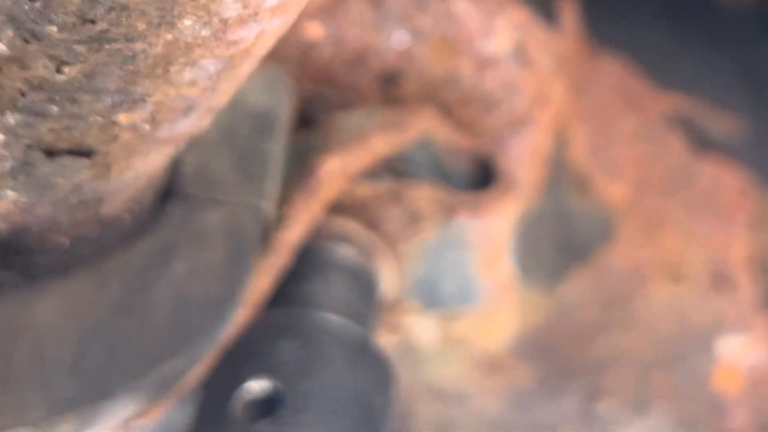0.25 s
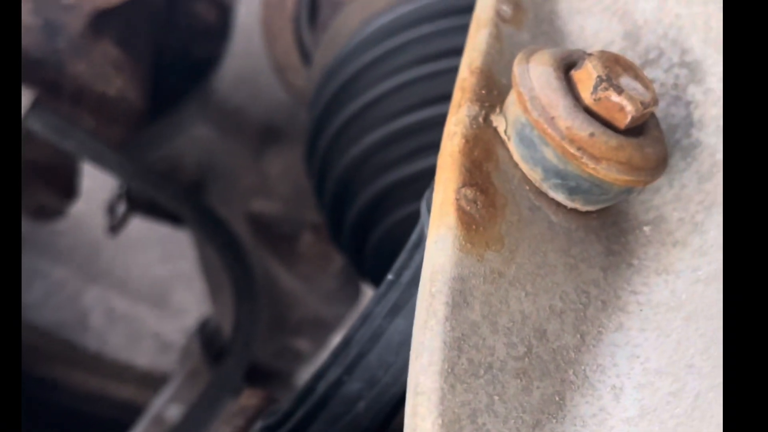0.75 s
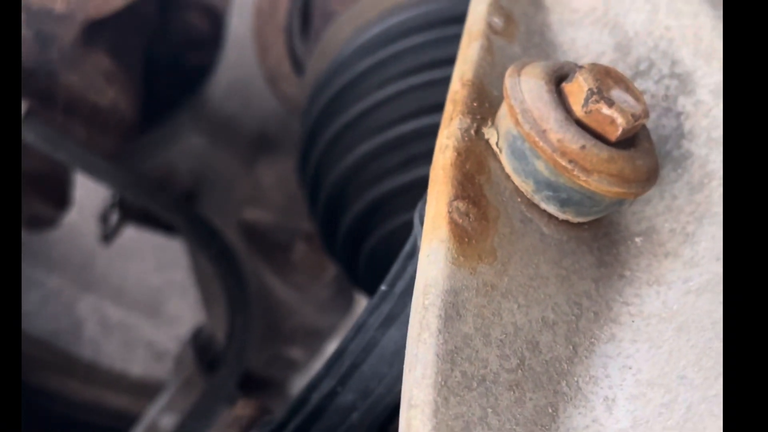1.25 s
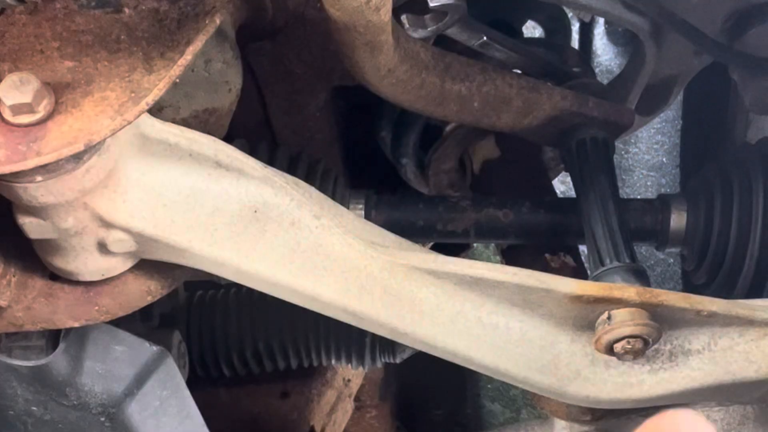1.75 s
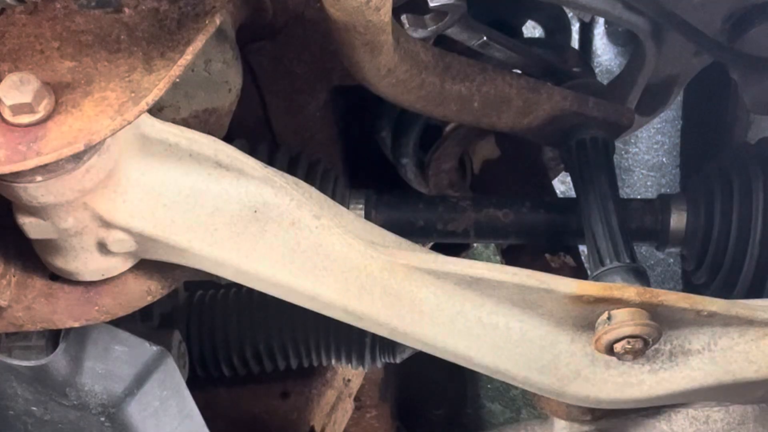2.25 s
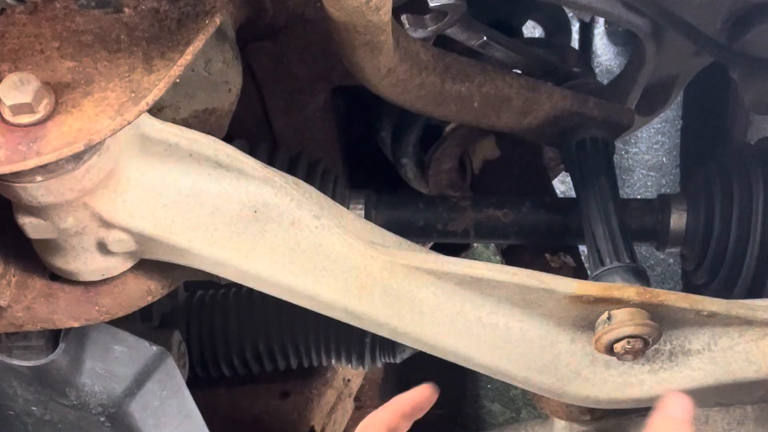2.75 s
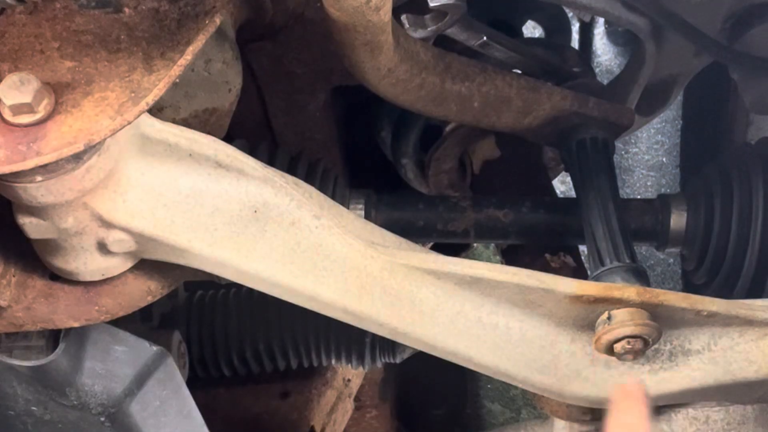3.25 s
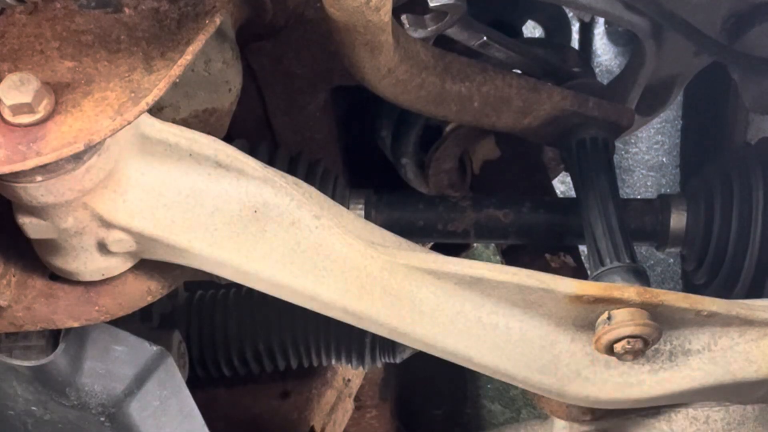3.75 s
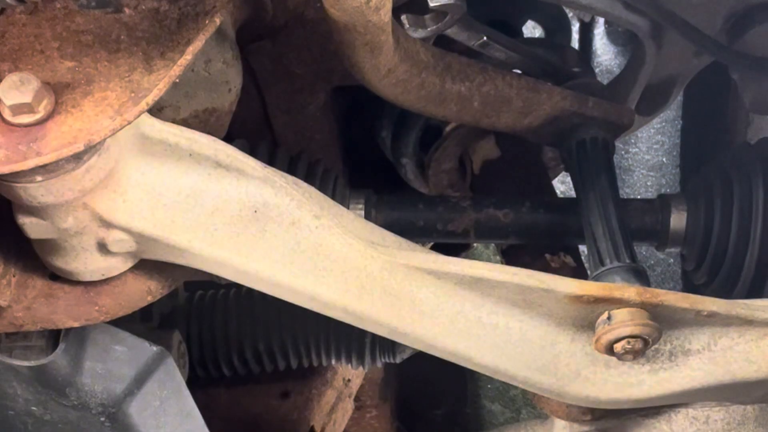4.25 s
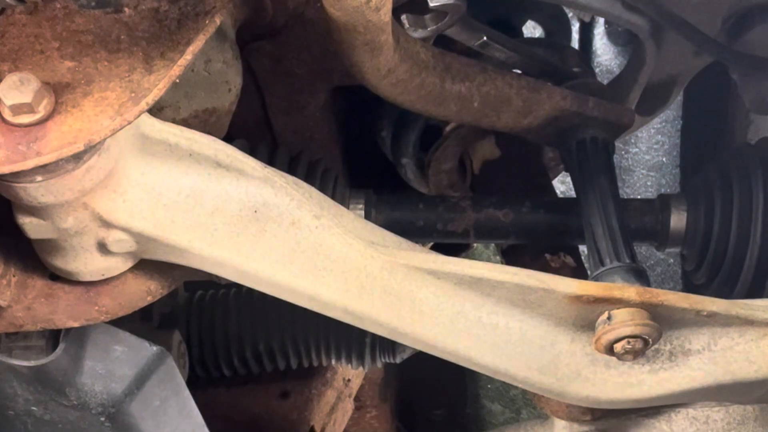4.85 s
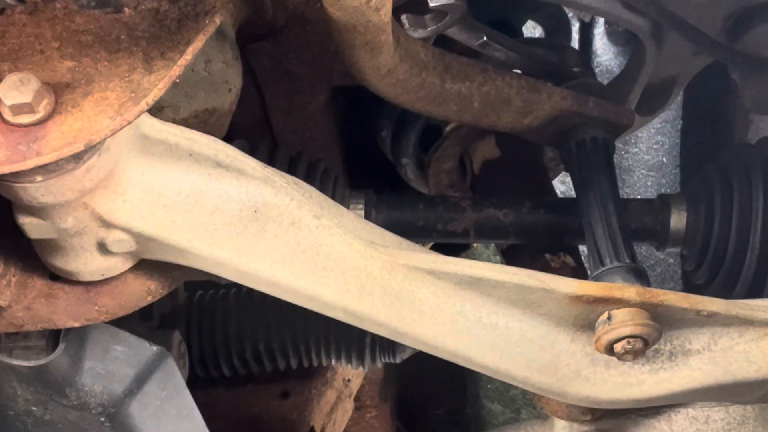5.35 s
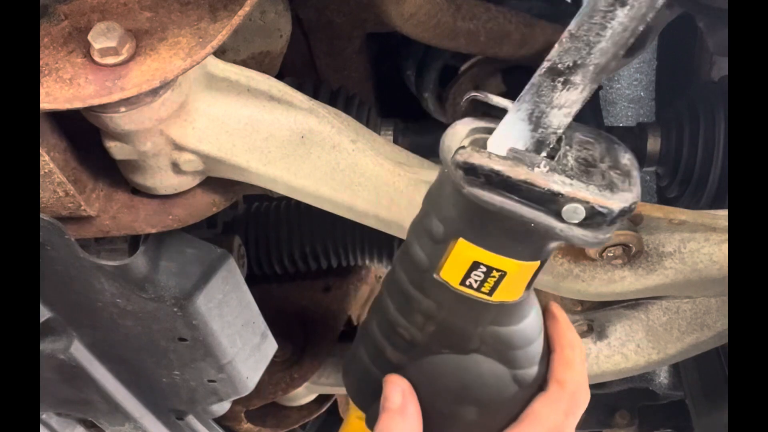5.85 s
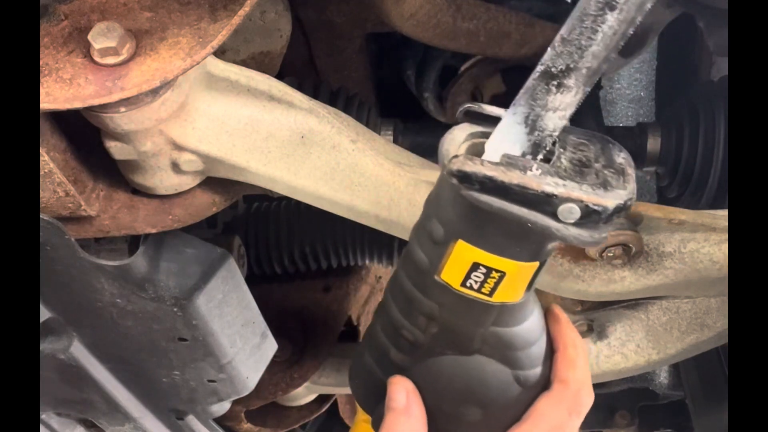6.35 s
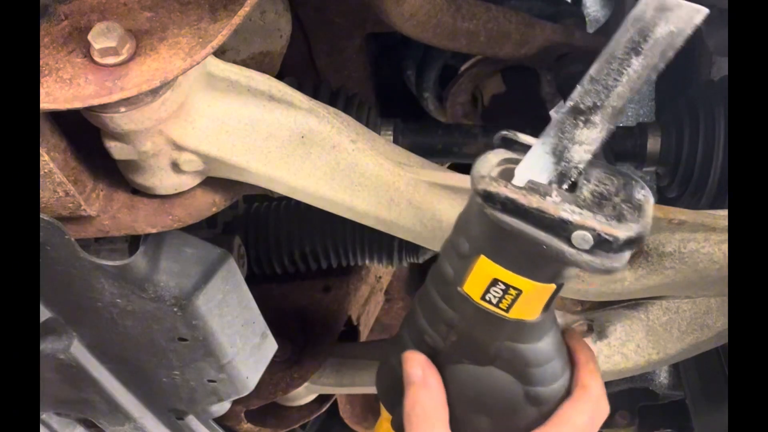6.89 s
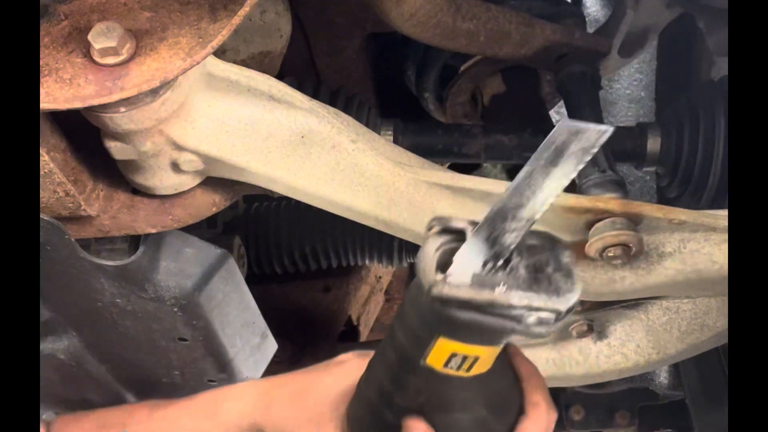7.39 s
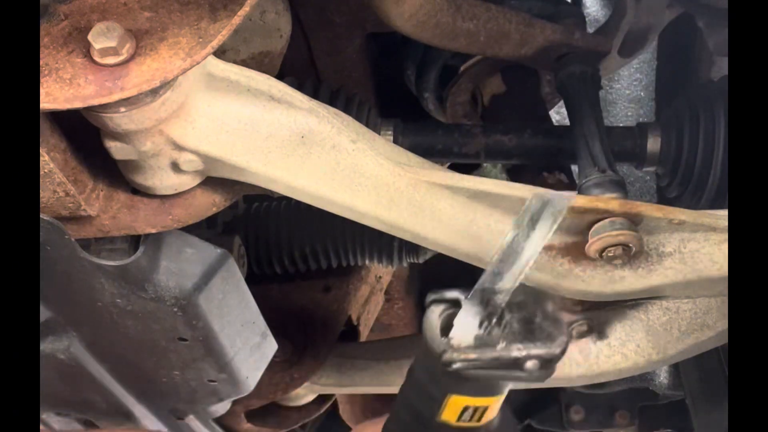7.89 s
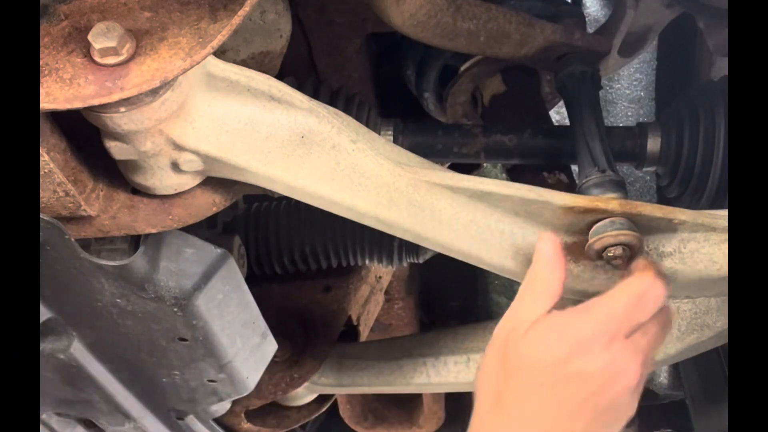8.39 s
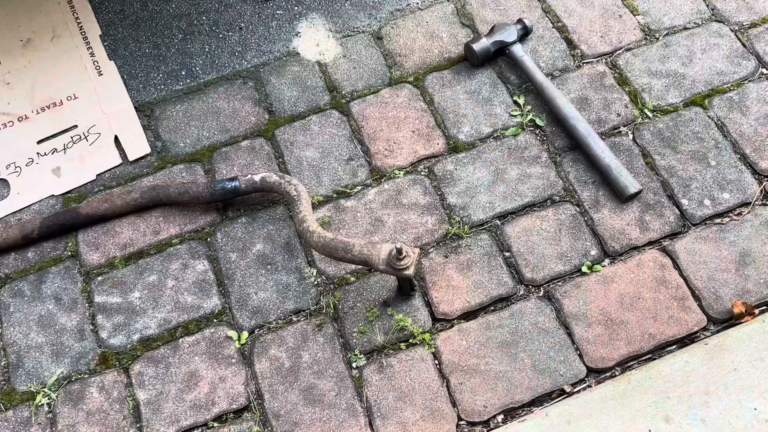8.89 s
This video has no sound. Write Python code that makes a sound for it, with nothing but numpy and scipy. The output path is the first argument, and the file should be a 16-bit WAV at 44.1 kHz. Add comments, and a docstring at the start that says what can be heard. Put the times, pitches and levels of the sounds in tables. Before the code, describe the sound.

A loose suspension rod knocks in metallic bursts over a truck's road rumble, then a cut to a few quiet footsteps.

```python
"""Inside a truck on a rough road. A loose stabiliser link (a suspension rod) knocks in bursts, ringing its
metal bar. Behind it the tyres boom, the body roars and thumps, air hisses and grit ticks. In some treble bands
left and right are in step, in others out of step, so the high sound is wide and hollow in the middle. The drive
plays twice (its last part, a short gap, then all of it), then cuts to a quiet yard with a few steps."""
import sys
import numpy as np
from scipy import signal
from scipy.fft import rfft, irfft, next_fast_len
from scipy.io import wavfile
from scipy.ndimage import uniform_filter1d, map_coordinates

SR = 44100
rng = np.random.default_rng(int(sys.argv[2]) if len(sys.argv) > 2 else 0)


def wav_out(sig):
    """Save sig, one row per channel (or a flat mono array), as 16-bit PCM at SR to the path in sys.argv[1]."""
    wavfile.write(sys.argv[1], SR, np.round(np.clip(np.atleast_2d(sig).T, -1, 1) * 32767).astype(np.int16))


N = 402633
TIME = np.arange(N) / SR
START_S, STOP_S = 3.58, 8.2005  # when the whole drive plays


def amp(db):
    """Turn decibels into a gain."""
    return 10 ** (np.asarray(db) / 20)


def unit(x):
    """Scale a sound to an average (rms) size of 1."""
    return x / np.sqrt(np.mean(x ** 2) + 1e-20)


def peak_one(pair):
    """Scale a two-row sound so that its first row peaks at 1."""
    return pair / np.abs(pair[0]).max()


def along(points, hz):
    """Read between (pitch, value) points on a log pitch scale."""
    pitches, values = np.transpose(points)
    return np.interp(np.log(hz + 1), np.log(pitches + 1), values)


def curves(rows):
    """Join (time, value, ...) rows into one curve per value column."""
    times, *columns = np.transpose(rows)
    return [np.interp(TIME, times, column) for column in columns]


def wobble(rate):
    """A smooth curve through `rate` random values a second."""
    return map_coordinates(rng.standard_normal(int(N * rate / SR) + 4), [TIME * rate])


def filtered(x, response):
    """Filter a sound; response(hz) gives the gain and phase at each pitch."""
    size = next_fast_len(x.shape[-1] + 2048)
    return irfft(rfft(x, size) * response(np.fft.rfftfreq(size, 1 / SR)), size)[..., :x.shape[-1]]


def resonances(peaks):
    """The response of something that rings at (pitch, width, level) peaks."""
    return lambda f: sum((-1) ** k * amp(db) * 1j * f * width / (hz * hz - f * f + 1j * f * width)
                         for k, (hz, width, db) in enumerate(peaks))


def rush(spectrum, patchy_db):
    """Two unrelated noises of the same tone colour, with random louder and softer patches."""
    cells = signal.stft(rng.standard_normal((2, N)), nperseg=512)[2]
    patches = uniform_filter1d(rng.standard_normal(cells.shape[1:]), size=5, axis=0)
    patches = unit(uniform_filter1d(patches, size=5, axis=1))
    pair = signal.istft(cells * amp(patchy_db * patches), nperseg=512)[1][:, :N]
    return unit(filtered(pair, lambda hz: amp(along(spectrum, hz))))


def add(track, start, sound):
    """Mix a two-row sound into the track at `start` seconds."""
    at = round(start * SR)
    track[:, at:at + sound.shape[1]] += sound[:, :N - at]


def tick(hz, fade, sharp):
    """A puff of noise around one pitch. Here and below, a fade is the time to fall 60 dB."""
    t = np.arange(SR // 12) / SR
    puff = rng.standard_normal((2, len(t))) * amp(-60 * t / fade) * (1 - np.exp(-t / .00054))
    b, a = signal.iirpeak(hz, sharp, SR)
    return peak_one(signal.lfilter(b, a, signal.lfilter(b, a, puff)))


def pulses(rows):
    """Very short tones that swell and die away. Returns their sound and its loudness outline."""
    out, t = np.zeros((2, N)), np.arange(-SR // 10, SR // 10) / SR
    for (start, db, hz, width), phase in zip(rows, rng.random(len(rows))):
        swell = amp(db) * np.exp(-.5 * (t / np.clip(width, .0008, .03)) ** 2)
        add(out, start + t[0], np.array([swell * np.sin(2 * np.pi * (hz * t + phase)), swell]))
    return out


# Tone colour of far traffic: (pitch [Hz], level [dB])
TRAFFIC_COLOUR = [(12, -40), (25, -25), (40, -12), (60, -2), (80, -3), (108, 0), (140, -8), (210, -16),
                  (260, -25), (400, -32), (900, -120)]

def traffic():
    """Far traffic hums, with one steadier tone inside the hum."""
    hum = amp(-54.5 + .91 * wobble(14)) * rush(TRAFFIC_COLOUR, patchy_db=-.2)
    hum[0] += amp(-57.5 + 1.3 * wobble(20)) * np.sin(2 * np.pi * 104 * TIME + 1.1 * wobble(8))
    return hum


# Shoe scuffs: (time [s], level [dB], fade [s], thump level [dB], thump pitch [Hz])
SCUFFS = [(8.219, -46.5, 0.12, -45, 520), (8.337, -71, .05, -56, 480), (8.356, -53, 0.15, -62, 500),
          (8.482, -44.5, 0.11, -50, 560), (8.735, -60, 0.11, -46.5, 420)]
# What rings under a step: (pitch [Hz], width [Hz], level [dB])
PAVING_RINGS = [(580, 63, 4), (1400, 29, -9), (1600, 28, -5), (2020, 40, -3), (2500, 35, -11),
                (2900, 35, -9), (3400, 60, -15), (4600, 31, -11)]
# A heel landing: (time [s], level [dB], pitch [Hz], half-length [s])
HEEL_THUD = [(8.74, -46, 125, .007)]

def footsteps():
    """Shoes thump and scuff on paving. Returns the sound and how much rustle each step adds."""
    out, stir = np.zeros((2, N)), np.zeros(N)
    for start, db, fade, thump_db, thump_hz in SCUFFS:
        since = np.clip(TIME - start, 0, 1)
        stir += amp(db - 12 - 60 * since / fade) * (1 - np.exp(-since / .0032))
        scuff = tick(1500, fade, sharp=.54)
        add(out, start, amp(thump_db) * tick(thump_hz, fade=.097, sharp=1))
        add(out, start, amp(db) * (scuff + 4 * filtered(scuff, resonances(PAVING_RINGS))))
    out[0] += pulses(HEEL_THUD)[0]
    return out, stir


# The rustle between steps: (time [s], level [dB])
RUSTLE_LEVELS = [(8.2, -54), (8.3, -65.5), (8.4, -61.5), (8.55, -65.5), (9.13, -70.5)]
# Its tone colour: (pitch [Hz], level [dB])
RUSTLE_COLOUR = [(150, -26), (350, -3.5), (550, -2.5), (1100, -10), (1600, -12.5), (1900, -13.5),
                 (2300, -19), (3000, -20), (3500, -24), (8800, -29.5), (9800, -49), (16000, -70)]
# Thin chirps: (time [s], level [dB], pitch [Hz])
YARD_CHIRPS = [(8.25, -67, 3520), (8.55, -75, 4580), (8.91, -72, 4650)]

def yard():
    """Traffic, steps, a rustle and chirps, in left and right; the two sides share mostly bass."""
    hum = traffic()
    steps, stir = footsteps()
    rustle_db, = curves(RUSTLE_LEVELS)
    rustle = (amp(rustle_db) + stir) * amp(1.2 * wobble(60)) * rush(RUSTLE_COLOUR, patchy_db=2)
    out = hum + steps + rustle
    for start, db, hz in YARD_CHIRPS:
        add(out, start, amp(db) * tick(hz, fade=.15, sharp=12))
    apart = filtered(out[1], lambda hz: .25 + .75 / (1 + (300 / (hz + 1)) ** 3))
    return np.array([out[0] + apart, out[0] - apart])


# Tone colour of the air: (pitch [Hz], level [dB])
HISS_COLOUR = [(900, -9), (1400, -2), (1700, -1), (1900, -4), (2800, -5.5), (3400, -8), (3700, -12),
               (4500, -13), (7500, -14), (10500, -17.5), (12000, -23), (15200, -25), (15900, -34.5),
               (16300, -56.5)]

def air_hiss(rough_db, lumps):
    """Air hisses and flickers, louder where the road is rougher."""
    level_db = -40 + .42 * rough_db + .94 * lumps + .81 * wobble(120) + .58 * wobble(14)
    return amp(level_db) * rush(HISS_COLOUR, patchy_db=1.5)


# Tone colour of the tyres: (pitch [Hz], level [dB])
BOOM_COLOUR = [(12, -59.5), (20, -28), (35, -4.5), (54, 0.5), (70, 0.5), (102, -7), (130, -15.5),
               (170, -19.5), (290, -120)]

def tyre_boom(boom_db):
    """Rolling tyres fill the cab with a deep, uneven boom."""
    return amp(boom_db - 1.5 + .99 * wobble(25)) * rush(BOOM_COLOUR, patchy_db=2)


# Tone colour of the truck's body: (pitch [Hz], level [dB])
ROAR_COLOUR = [(59, -22.5), (100, 1.5), (226, -3.5), (296, -0.5), (360, -8.5), (491, -1), (566, -5.5),
               (644, -5.5), (1110, -9.5), (2200, -28), (2860, -45.5), (4840, -120)]
# Where its panels ring: (pitch [Hz], width [Hz], level [dB])
PANEL_RINGS = [(205, 30, -12), (303.4, 16, 3.5), (369, 56, -4.5), (472.6, 8.5, -3), (530.6, 6.9, -8),
               (615.5, 12, 6), (785, 7.5, -11), (988, 22, -8.5), (1135, 30, -16.5)]

def body_roar(roar_db, rough_db, lumps):
    """The body roars; the rougher the road, the more its ringing panels stand out."""
    body = rush(ROAR_COLOUR, patchy_db=1.5)
    panels = unit(filtered(body * amp(1.5 * wobble(30)), resonances(PANEL_RINGS)))
    level_db = roar_db - .85 + 1.97 * lumps + .46 * wobble(12)
    return amp(level_db) * (body + amp(.88 * rough_db - 7.5) * panels)


# How loud the road is: (time [s], roar level [dB], boom level [dB])
ROAD_LEVELS = [(3.6, -29, -31), (3.72, -25.5, -23.5), (4.0, -26.5, -24), (4.28, -24, -27.5),
               (4.46, -24, -28), (4.62, -24, -26), (4.95, -23, -21.5), (5.2, -21, -28.5), (5.4, -20, -21.5),
               (5.5, -21, -28.5), (5.63, -19.5, -24), (5.72, -22, -25.5), (5.8, -21.5, -23),
               (6.0, -23.5, -25.5), (6.36, -23.5, -20), (6.5, -23, -26), (6.95, -27, -28.5),
               (7.3, -27.5, -33), (7.65, -26, -28.5), (7.95, -28, -26), (8.19, -28, -28)]
# Wheel bumps that ring the cab: (time [s], level [dB], pitch [Hz], half-length [s])
WHEEL_BUMPS = [(3.7181, -21, 64, 0.029), (3.83, -27.5, 82, 0.032), (3.9479, -18, 59, 0.009),
               (4.0423, -19, 54, 0.009), (4.232, -22, 59, 0.022), (4.2712, -17, 69, 0.011),
               (4.3541, -19.5, 89, 0.0066), (4.5397, -20, 54, 0.04), (4.6893, -25.5, 59, 0.027),
               (4.7929, -23, 76, 0.009), (5.0255, -22, 59, 0.01), (5.079, -23, 50, 0.019),
               (5.1982, -18.5, 54, 0.021), (5.3772, -16.5, 64, 0.012), (5.6365, -16, 64, 0.0083),
               (5.7165, -18.5, 82, 0.016), (5.9755, -17.5, 69, 0.0062), (6.0147, -30.5, 59, 0.018),
               (6.1569, -17.5, 64, 0.014), (6.2291, -26.5, 69, 0.018), (6.2892, -15, 59, 0.012),
               (6.3492, -17, 69, 0.025), (7.0177, -22.5, 69, 0.011), (7.1071, -24.5, 69, 0.018),
               (7.239, -21, 69, 0.012), (7.3419, -26, 59, 0.025), (7.4449, -20.5, 64, 0.011),
               (7.8634, -23, 64, 0.025), (8.0686, -17.5, 76, 0.0065), (8.1629, -24, 59, 0.025)]

def road():
    """The road drives the boom, roar and hiss; each bump briefly lifts the roar and hiss."""
    bumps, swell = pulses(WHEEL_BUMPS)
    roar_db, boom_db = curves(ROAD_LEVELS)
    rough_db = roar_db + 27  # how far above a smooth road
    shake_db = 2.5 * swell
    lumps = wobble(45)  # roar and hiss flutter together
    boom = tyre_boom(boom_db) + bumps * [[1.1], [.35]]
    return boom + body_roar(roar_db + shake_db, rough_db, lumps) + air_hiss(rough_db + shake_db, lumps)


# Sharp ticks: grit, and the light first touch just before two loud knocks:
# (time [s], level [dB], pitch [Hz], fade [s])
SHARP_TICKS = [(4.0604, -34.5, 4000, .02), (4.161, -38, 3000, .01), (4.279, -33.5, 3030, .012),
               (4.392, -22.5, 4960, .01), (4.6697, -30.5, 2960, .012), (4.8509, -22, 3000, 0.014),
               (4.8561, -16.5, 4080, 0.02), (4.879, -32.5, 9000, .01), (4.904, -34, 2960, .012),
               (4.957, -20, 3000, .02), (5.583, -21, 2410, .015), (5.619, -19, 3200, .02),
               (5.659, -27, 3520, 0.011), (6.188, -25, 2810, 0.009), (6.8181, -20, 3360, 0.017),
               (6.971, -35.5, 2990, 0.0089), (7.0463, -28, 2470, .015), (7.105, -35.5, 3030, .01),
               (7.1521, -34, 2600, .012), (7.317, -27.5, 1500, .008), (7.4451, -28, 1800, .015),
               (7.546, -33.5, 1600, .008), (7.5972, -34.5, 1990, .01), (7.6396, -46, 2400, .01),
               (7.859, -25, 1700, .008), (7.9266, -26, 5500, .025), (7.976, -28, 1300, .02),
               (7.9947, -39, 3010, .01), (8.112, -25, 2280, .012), (8.162, -27, 5520, .02),
               (8.1848, -34.5, 6000, .008)]
# Short, dull thumps of the truck's body, some with the knocks, some between them:
# (time [s], level [dB], pitch [Hz], half-length [s])
BODY_THUMPS = [(3.7738, -20, 201, 0.011), (3.8173, -22.5, 149, 0.003), (3.9583, -18.5, 570.0, 0.0021),
               (4.2402, -12, 430.0, 0.00104), (4.262, -17, 149.4, 0.0055), (4.283, -15, 303.0, 0.0013),
               (4.4981, -14, 580, 0.002), (4.5052, -20.5, 318, 0.012), (4.5509, -18, 570.0, 0.005),
               (4.6128, -15, 1140, 0.0012), (4.9304, -9.5, 611.0, 0.00067), (5.093, -11, 244, 0.0015),
               (5.0979, -20.5, 451, 0.015), (5.1349, -19, 630, 0.0056), (5.1367, -13, 375, 0.0017),
               (5.1472, -15, 378, 0.004), (5.1577, -20, 495.0, 0.002), (5.2218, -12, 420, 0.0037),
               (5.2486, -15.5, 388, 0.011), (5.3098, -21.5, 305, 0.008), (5.3346, -14.5, 461, 0.0092),
               (5.3526, -12, 213.0, 0.0042), (5.376, -14, 643, 0.0027), (5.3923, -15, 376, 0.0096),
               (5.4112, -9.5, 608, 0.0018), (5.4161, -14, 350, 0.0012), (5.4973, -12.5, 427, 0.0018),
               (5.5436, -15, 495.0, 0.0018), (5.5532, -11.5, 453, 0.0011), (5.5853, -22.5, 607, 0.003),
               (5.5882, -10, 304.3, 0.0014), (5.633, -29, 405, 0.0056), (5.7823, -18, 304, 0.0063),
               (5.7994, -15, 609, 0.0047), (5.8092, -16.5, 280, 0.0066), (5.9033, -21.5, 190, 0.023),
               (6.2229, -9.5, 303.0, 0.0012), (6.267, -17, 497, 0.0072), (6.269, -16, 185.0, 0.002),
               (6.2792, -20, 303.0, 0.0012), (6.2797, -15.5, 148.4, 0.004), (6.3536, -10, 401.0, 0.00059),
               (6.3634, -21, 230, 0.012), (6.5849, -13, 1010, 0.00087), (6.5945, -10, 863, 0.0014),
               (6.7458, -17, 531.0, 0.0023), (6.8263, -18.5, 615, 0.0036), (6.9805, -22, 493, 0.0065),
               (7.052, -11.5, 630, 0.00078), (7.6818, -14, 401.0, 0.0017), (7.6858, -15, 703.0, 0.0013),
               (7.7217, -22.5, 296, 0.011), (7.943, -14.5, 585, 0.001), (7.978, -18, 725, 0.0016),
               (7.981, -22, 1100, 0.0022), (8.0631, -13.5, 303.0, 0.0014), (8.0664, -19, 151, 0.0054)]
# Brief metal squeaks: (time [s], level [dB], pitch [Hz], fade [s])
SQUEAKS = [(5.895, -35, 2450, .15), (6.047, -34, 4150, 0.1)]

def ticks_and_thumps():
    """Sharp ticks, mostly grit on the underside, with dull body thumps and metal squeaks."""
    out = np.zeros((2, N))
    for start, db, hz, fade in SHARP_TICKS:
        add(out, start - .0005, amp(db) * tick(hz, fade, sharp=.72))
    out += pulses(BODY_THUMPS)[0] * [[.9], [.45]]
    for start, db, hz, fade in SQUEAKS:
        add(out, start, amp(db) * tick(hz, fade, sharp=12))
    for when, softness, pitch in rng.random((300, 3)):  # fine grit in between
        hz = 450 * 8 ** pitch
        db = -27.5 - 13 * pitch - 2.6 * np.log(softness + .05)
        add(out, START_S + when * (STOP_S - START_S), amp(db) * tick(hz, fade=11 / hz, sharp=1.1))
    return out * [[1.1], [.75]]  # small sources sound more alike left and right


# Ringing tones of the bar and its bracket: (pitch [Hz], level [dB], fade [s])
BAR_TONES = [(966, -8, .12), (1184, -11, .1), (1309, -3, .12), (1415, -11, .2), (1529, 0, .09),
             (1600, -8, .08), (1872, -9, .045), (2480, -14, .06), (2744, -5, .075), (3043, -7, .07),
             (3200, -3, .065), (3380, 0, .07), (3600, -6, .06), (3764, -6, .065), (3950, -8, .06),
             (4170, -12, .06), (5023, -9, .07), (5200, -10, .06), (5350, -13, .06), (5612, -7, .07),
             (5900, -15, .045)]

def bar_ring(t, ring_age, favoured_hz, treble_db, bass_db):
    """A blow rings the bar's tones, each at a new strength. Returns the deep and the bright ring."""
    hz, level_db, fade = np.transpose(BAR_TONES)[:, :, None]
    low, treble = hz < 2200, hz > 4500
    low_hz, middle_hz, high_hz = favoured_hz
    strength, phase = rng.standard_normal((2, 2, len(hz), 1))
    # Rust and rubber blur the ring.
    blur = np.cumsum(rng.standard_normal((len(hz), len(t))), axis=1) * (.02 + hz * 1e-5)
    nearest_hz = np.where(treble, high_hz, np.where(low, low_hz, middle_hz))
    boost_db = 3.5 * np.exp(-.5 * ((hz / nearest_hz - 1) / .052) ** 2)  # near a favoured pitch
    struck_db = level_db + boost_db + treble_db * treble + bass_db * (hz < 1450) + 2.6 * strength
    age = np.where(low, t, ring_age / .51)  # after contact, bright tones die about twice as fast
    tones = amp(struck_db - 60 * age / fade) * np.sin(2 * np.pi * hz * t + blur + 3 * phase)
    deep = tones[:, low[:, 0]].sum(axis=1) * (1 - np.exp(-t / .0025))
    bright = tones[:, ~low[:, 0]].sum(axis=1) * (1 - np.exp(-t / .00096))
    return peak_one(deep), peak_one(bright)


# Tone colour of the bracket's clack: (pitch [Hz], level [dB])
CLACK_COLOUR = [(700, -31), (1300, -7), (1600, 0), (2200, -15), (3200, -8), (4400, -12.5), (5500, -11),
                (6500, -23.5), (9000, -22.5), (16000, -54)]

def bracket_hit(t, ring_age, treble_db):
    """Returns the bracket's noisy clack, which echoes in the wheel arch, and a short, high crack."""
    clack, crack = rng.standard_normal((2, 2, len(t))) * (1 - np.exp(-t / .00082))
    direct, echo = amp(-60 * ring_age / .081), amp(-15.5 - 60 * t / .33)
    clack = filtered(clack * (direct + echo),
                     lambda hz: amp(along(CLACK_COLOUR, hz) + treble_db * (hz > 4500)))
    crack = filtered(crack * amp(-60 * t / .03), lambda hz: (hz / 7000) ** 2 / (1 + (hz / 7000) ** 4))
    return peak_one(clack), peak_one(crack)


# Blows of the link: (time [s], level [dB], deep ring gain [dB], favoured low pitch [Hz], favoured
# middle pitch [Hz], favoured high pitch [Hz], treble gain [dB], bass gain [dB], contact time [s])
LINK_KNOCKS = [(3.922, -25.5, -1, 1530, 3430, 5400, -3, 1.5, .004),
               (3.988, -29.5, -4, 1530, 3350, 5400, -6, -1.5, .004),
               (4.212, -16.5, -8.5, 1530, 3350, 5500, -1, 3, 0.0078),
               (4.523, -8.5, -7, 1420, 3290, 5500, 1, -0.5, .006),
               (4.5946, -26, -0.5, 1530, 3360, 5400, -6, 2, .004),
               (4.719, -10, -5, 1510, 3280, 5400, -1, -0.5, 0.0068),
               (4.812, -17, -10, 1190, 3330, 5050, -8, -2.5, .005),
               (4.961, -5.5, -5.5, 1483, 3230, 5500, 3, -0.5, .005),
               (5.037, -8, -4.5, 1485, 3380, 4950, -2, 1, 0.0053),
               (5.133, -6, -2.5, 1530, 3050, 5100, 0.5, 3.5, .01),
               (5.209, -2.5, -7, 1416, 3210, 5650, 0.5, 1, .006),
               (5.288, -6.5, -6, 1542, 3420, 5000, -1, -2, 0.007),
               (5.3705, -3, -6.5, 1458, 3350, 5250, 0.5, 1, 0.0056),
               (5.452, -12.5, -6, 1320, 3280, 5200, -5.5, 0.5, .007),
               (5.5349, -5.5, -3.5, 1550, 3520, 5550, 0.5, 1.5, 0.0084),
               (5.6227, -4, -4.5, 1295, 3420, 5150, -1, -3, .007),
               (5.775, -9, -5, 1200, 3230, 5650, 1.5, 1.5, 0.0079),
               (6.132, -20, -4.5, 1536, 3370, 5300, -1, 0.5, .005),
               (6.5611, -13, -6, 1536, 3500, 5280, 0, 0, .006),
               (6.7127, -12.5, -4.5, 1560, 3120, 5620, -0.5, 0.5, 0.0063),
               (6.784, -24.5, -1.5, 1530, 3360, 5400, -4.5, -1, .005),
               (6.862, -22, -3.5, 1530, 3380, 5400, -3.5, -5, .006),
               (7.7469, -23.5, -3.5, 1520, 3360, 5400, -2.5, 4, .005)]

def loose_link():
    """Each knock of the loose link rings the bar, clacks the bracket and thumps through the body."""
    out, t = np.zeros((2, N)), np.arange(SR // 7) / SR
    for start, db, deep_db, *favoured_hz, treble_db, bass_db, contact in LINK_KNOCKS:
        released = np.logaddexp(0, (t - contact) / .002) * .002  # time since the parts let go
        ring_age = released + .54 * (t - released)  # fading is slower while they touch
        deep, bright = bar_ring(t, ring_age, favoured_hz, treble_db, bass_db)
        clack, crack = bracket_hit(t, ring_age, treble_db)
        crack_db = -14.5 + .22 * db  # harder blows crack brighter
        knock = amp(-6) * bright + amp(deep_db) * deep + amp(-8.5) * clack + amp(crack_db) * crack
        thump = amp(deep_db - 4) * tick(450, fade=.15, sharp=1.08)
        add(out, start - .001, amp(db) * knock)
        add(out, start, amp(db) * thump)
    return out * [[1.1], [.7]]  # one small source: more alike left and right than the road


# How alike left and right sound: (pitch [Hz], likeness [0 to 1])
LIKENESS = [(50, 0.7), (130, 0.5), (300, 0.43), (640, 0.16), (1000, 0.53), (1700, 0.73), (3100, 0.51),
            (4000, 0.3), (6500, 0.21), (7500, 0.28), (9300, 1), (15000, 0.96)]
# Bands where left and right treble are in or out of step: (pitch [Hz], phase gap [radians])
PHASE_GAP = [(0, 0), (5000, -.2), (5900, -1.3), (7000, -.3), (8600, -1.7), (9300, -np.pi), (11300, -np.pi),
             (12200, -2 * np.pi), (14500, -2 * np.pi), (15400, -3 * np.pi)]
# How much louder the left side is: (pitch [Hz], level [dB])
LEFT_GAIN = [(60, 1.5), (200, 1.5), (380, 0), (800, -2.5), (1700, -0.5), (3100, 1), (4500, 3.5),
             (5700, 8.5), (6600, 2), (9300, 0.5), (16000, 0.5)]

def widen(pair):
    """Make a wide, hollow left and right: the first row is shared, the second sets them apart."""
    def blend(hz):
        angle = np.arccos(np.clip(along(LIKENESS, hz), 0, 1)) / 2
        return np.array([np.cos(angle), np.sin(angle)])

    def sides(hz):
        gap = np.interp(hz, *np.transpose(PHASE_GAP))
        left = amp(along(LEFT_GAIN, hz) / 2) * np.exp(.5j * gap)
        return np.array([left, 1 / left])

    shared, apart = filtered(pair, blend)
    return filtered(np.array([shared + apart, shared - apart]), sides)


def scene():
    """The last part of the drive, a short gap, the whole drive, then the yard."""
    fade_in = np.clip((TIME - START_S) / .006, amp(-26), 1)  # the gap is not quite silent
    cut_off = np.clip((STOP_S - TIME) / .001, 0, 1)
    drive = widen(road() + loose_link() + ticks_and_thumps()) * fade_in * cut_off
    repeat_samples = 204550  # from one play to the next
    opening = drive[:, repeat_samples:round(STOP_S * SR)]
    both_plays = np.concatenate([opening, drive[:, opening.shape[1]:]], axis=1)
    return both_plays + yard() * (TIME >= STOP_S)


def record(dry):
    """Round off the loudest knocks and remove the very highest treble."""
    rounded = dry / (1 + np.abs(dry / .95) ** 6) ** (1 / 6)
    return filtered(rounded, lambda hz: hz < 16400)


dry = scene()
out = record(dry)
wav_out(out)
```